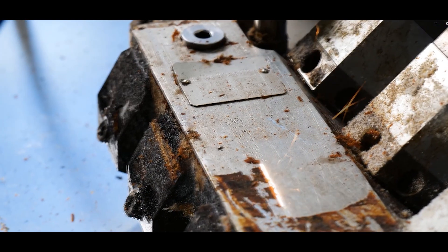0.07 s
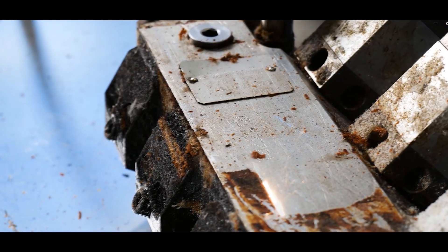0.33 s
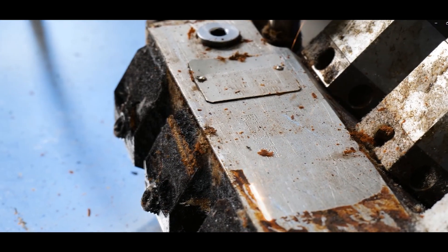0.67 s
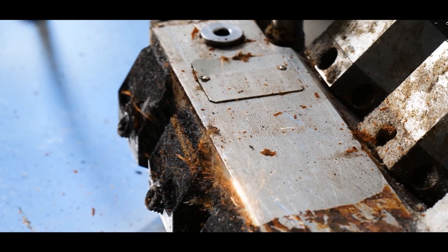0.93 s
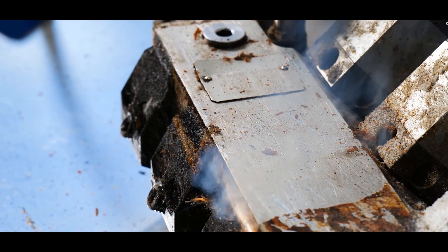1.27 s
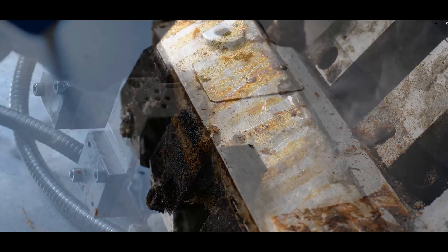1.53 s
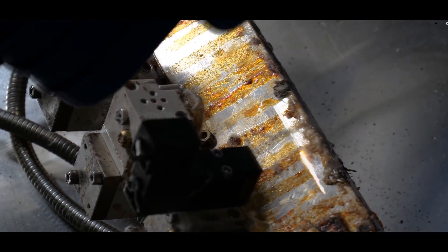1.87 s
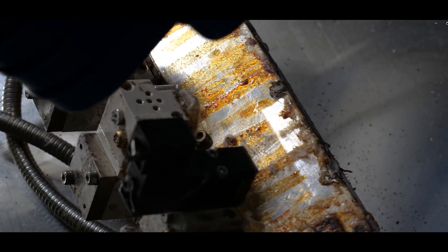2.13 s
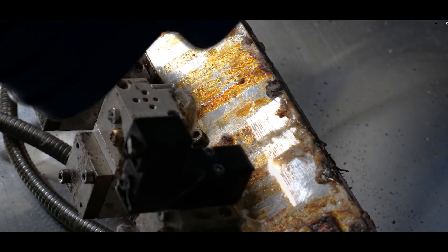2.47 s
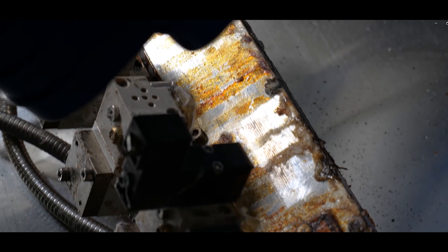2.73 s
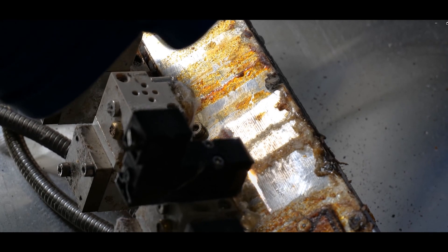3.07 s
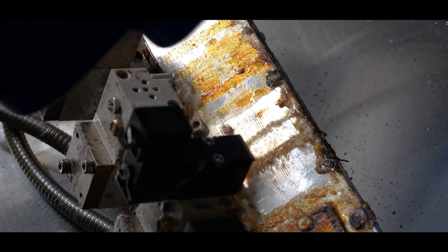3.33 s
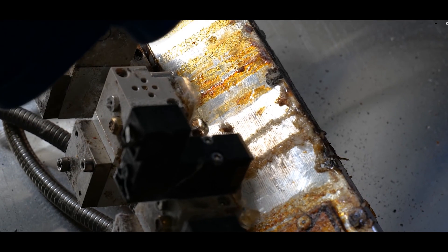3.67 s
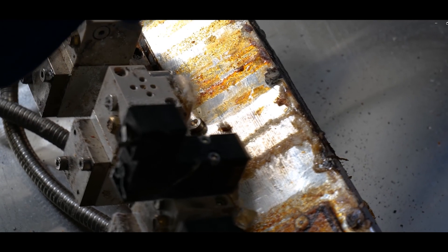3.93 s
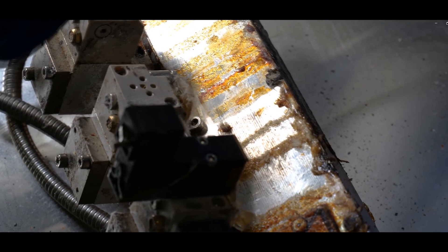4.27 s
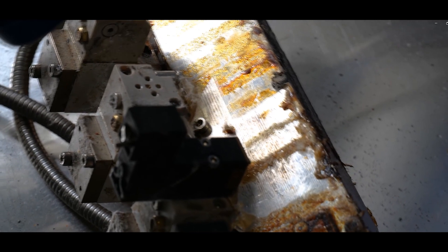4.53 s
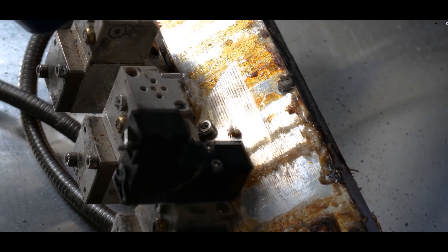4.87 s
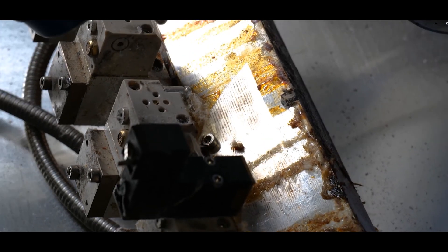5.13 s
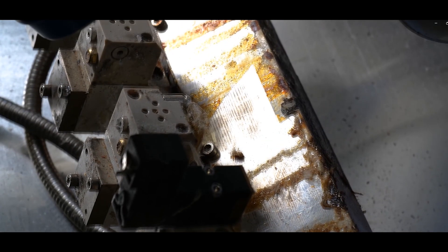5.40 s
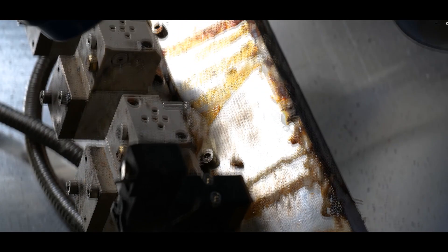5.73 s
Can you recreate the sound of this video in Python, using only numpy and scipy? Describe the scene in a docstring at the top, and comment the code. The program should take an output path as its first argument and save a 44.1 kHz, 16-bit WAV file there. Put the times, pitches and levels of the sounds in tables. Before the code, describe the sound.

A laser cleaner strips rust from steel with a piercing, fluttering whine and sizzle over a low fan hum.

```python
"""In a workshop, a hand-held pulsed laser strips rust from a steel part close to the microphone.
Each shot pops a tiny plume, and this periodic train is heard as a piercing whine with two overtones.
A mirror swings the beam to and fro, so the whine is amplitude-modulated and Doppler-shifted.
The bursting rust sizzles, thick flakes snap off, and the room adds a short reverberation.
Behind it a fan hums over the broadband noise of turbulent air."""
import sys
import numpy as np
from scipy import signal
from scipy.fft import rfft, irfft, next_fast_len
from scipy.io import wavfile
from scipy.ndimage import uniform_filter1d, map_coordinates

SR = 44100
rng = np.random.default_rng(int(sys.argv[2]) if len(sys.argv) > 2 else 0)


def to_wav(s):
    """Save 16-bit WAV."""
    ch = np.atleast_2d(s).T  # columns
    pcm = np.round(np.clip(ch, -1, 1) * 32767)  # PCM
    wavfile.write(sys.argv[1], SR, pcm.astype(np.int16))


N = 263718
TIME = np.arange(N) / SR
OPPOSED = np.array([[1], [-1]])  # opposite signs for left and right


def undb(db):
    """Amplitude ratio of a level in decibels."""
    return 10 ** (np.asarray(db) / 20)


def unit(x):
    """Normalisation to rms 1."""
    return x / np.sqrt(np.mean(x ** 2))


def curves(table):
    """Linear interpolation of each column over time."""
    times, *columns = np.transpose(table)
    return [np.interp(TIME, times, column) for column in columns]


def walk(rate_hz):
    """Low-pass random modulation: held values, smoothed twice, with a spread near 1."""
    hold = max(int(SR / rate_hz), 1)
    steps = np.repeat(rng.standard_normal(N // hold + 1), hold)
    return 1.361 * uniform_filter1d(uniform_filter1d(steps, hold), hold)[:N]


def noise(colour, side_db):
    """Spectrally shaped mid-side noise of rms 1; side_db, a value or a spectrum, sets its width."""
    size = next_fast_len(N)
    log_hz = np.log(np.fft.rfftfreq(size, 1 / SR) + 1)

    def gain(spectrum):
        hz, db = np.transpose(spectrum)
        return undb(np.interp(log_hz, np.log(hz), db))

    mid, side = rfft(rng.standard_normal((2, size))) * gain(colour)
    width = gain(side_db) if np.ndim(side_db) else undb(side_db)
    return unit(irfft(mid + width * side * OPPOSED, size)[:, :N])


def wavering(hz, spread_hz):
    """Random frequency modulation of a tone of rms 1."""
    return np.sqrt(2) * np.sin(2 * np.pi * np.cumsum(hz + spread_hz * walk(25)) / SR)


def turbulence(rumble_db, rush_db):
    """Turbulent flow radiates broadband noise: a low rumble and a rush of air."""
    # spectra of the fan's noise: (frequency [Hz], relative level [dB])
    rumble_colour = [(25, -31), (50, -27.5), (90, -22.5), (115, -12.5), (140, -1.5), (165, -4.5),
                     (200, 1.5), (270, 1.5), (350, -1.5), (450, -14), (700, -32.5)]
    rush_colour = [(60, -16), (250, -10), (480, 1.5), (850, 3.5), (1100, -0.5), (1500, 1), (2000, -3.5),
                   (2700, -11.5), (4000, -14), (9000, -40)]
    # stereo width: (frequency [Hz], side minus mid [dB])
    width = [(30, -18), (65, -9), (130, -25), (250, -24.5), (500, -14.5), (1000, -7), (2000, -8.5),
             (4000, -11)]
    rumble = noise(rumble_colour, width) * undb(rumble_db - 1.3)
    rush = noise(rush_colour, width) * undb(rush_db - .42 - .7 * OPPOSED)
    return rumble + rush


def blade_hum():
    """The periodic passage of the blades gives a tone, which swells and sinks."""
    # envelope: (time [s], relative level [dB])
    envelope = [(0.0, -45.5), (0.53, -46), (0.61, -36.5), (0.68, -47), (1.5, -42), (1.56, -52),
                (1.7, -34.5), (2.06, -47), (2.2, -31.5), (2.43, -46.5), (3.08, -40.5), (3.3, -57),
                (3.35, -40.5), (3.61, -48), (4.18, -39), (4.23, -50), (4.43, -41), (4.46, -54),
                (5.51, -36.5), (5.56, -49), (5.73, -38.5), (5.98, -56)]
    return wavering(hz=192.7, spread_hz=3.3) * undb(curves(envelope)[0] - 1 + 1.8 * walk(14))


def motor_whistle(hz=1922):
    """A thin motor tone comes and goes, randomly modulated in amplitude and phase."""
    # envelope: (time [s], level [dB])
    envelope = [(0, -66), (1.1, -64), (1.4, -56.5), (2.2, -52.5), (2.7, -61.5), (4, -61.5), (5.98, -73)]
    gain = undb(curves(envelope)[0] + 2.1 * walk(10.2))
    return gain * np.sqrt(2) * np.sin(2 * np.pi * hz * TIME + .5 * walk(24.95))


def fan():
    """Superposition of flow noise and machine tones; the higher tones swell with the rumble."""
    # loudness of the background rumble and rush, swelling and sinking:
    # (time [s], relative rumble level [dB], relative rush level [dB])
    loudness = [(0.0, -40.5, -46.5), (0.27, -39, -44), (0.45, -42, -45.5), (0.59, -36.5, -42.5),
                (0.8, -41, -47), (0.96, -37.5, -43.0), (1.09, -40.5, -44), (1.6, -38, -45),
                (1.73, -31.5, -42.5), (1.98, -40.0, -47), (2.18, -32.5, -45), (2.63, -43.0, -48.5),
                (2.78, -38, -46), (3.07, -38, -46), (3.19, -40.5, -49.0), (3.83, -40, -47.5),
                (4.03, -34, -44), (4.88, -42.5, -48.5), (5.42, -34.5, -45), (5.62, -34.5, -44),
                (5.75, -32.5, -42), (5.97, -43.5, -51)]
    # higher tones of fan and motor: (frequency [Hz], relative level [dB])
    lines = [(351, -51.5), (570.6, -59), (629.8, -62.5), (705.2, -58), (802.1, -58.5), (866.7, -58.5),
             (1443, -60.5)]
    rumble_db, rush_db = curves(loudness)
    air = turbulence(rumble_db, rush_db)
    hum = blade_hum()
    tones = sum(wavering(hz, spread_hz=3.59) * undb(db - 3 + 3 * walk(12)) for hz, db in lines)
    swell = undb(1.14 * (rumble_db - np.mean(rumble_db)))
    return air + hum + tones * swell + motor_whistle()


def workshop(x, t60_s, wet_db):
    """Diffuse reverberation: dense reflections decay exponentially, different at each ear."""
    t = TIME[:SR // 2]
    tail = rng.standard_normal((2, len(t))) * np.exp(-np.log(1000) * t / t60_s) * (t > .002)
    tail /= np.sqrt(np.sum(tail ** 2, axis=1, keepdims=True))
    return x + undb(wet_db) * signal.fftconvolve(x, tail, axes=1)[:, :N]


def mirror(fast_hz=35.3, slow_hz=26.81, slower_flutter_from_s=1.632, stroke_m=.032):
    """Triangular scan: swings made, place on the line (0 near, 1 far) and extra sound path [m]."""
    # the fast flutter gives way to a slower one
    flutter_hz = np.where(TIME > slower_flutter_from_s, slow_hz, fast_hz)
    swings = np.cumsum(flutter_hz) / SR - .23
    place = 1 - np.abs(1 - 2 * (swings % 1))
    path_m = stroke_m * uniform_filter1d(place, size=260)  # inertia rounds the turning points
    return swings, place, path_m


def rust(place, count, renew_hz):
    """Quasi-periodic modulation: each stroke meets the same grain, renewed as the hand moves on."""
    surface = rng.standard_normal((256, count + 1))
    return unit(map_coordinates(surface, [TIME * renew_hz, place * count], order=1, mode="mirror"))


def per_swing(gain):
    """Normalisation to a running rms near 1, averaged over a slow and a fast flutter period."""
    power = uniform_filter1d(uniform_filter1d(gain ** 2, size=1645), size=1249)
    return gain / np.sqrt(power)


def flutter(swings, swells):
    """Amplitude modulation: a Gaussian swell where the beam crosses rust, going out and coming back."""
    out_place, out_width, out_db, back_place, back_width, back_db = curves(swells)
    crossings = (out_place / 2, out_width, out_db), (1 - back_place / 2, back_width, back_db)
    gain = 1
    for centre, width, db in crossings:
        distance = 2 * ((swings - centre + .5) % 1 - .5)
        gain = gain + undb(db) * np.exp(-(distance / np.maximum(width, .03)) ** 2)
    return per_swing(gain)


def interference(place, fringes_per_line=2.13):
    """Sound reflected by the steel cancels and reinforces the direct sound in turn along the line."""
    # strength of the fringes: (time [s], depth [0-1])
    depth = [(0, 0.17), (.9, .15), (2.0, 0.28), (3.0, 0.17), (3.6, 0.25), (4.3, 0), (4.75, 0.23),
             (4.93, 0.6), (5.1, 0.6), (5.35, .35), (5.97, 0.2)]
    return 1 + curves(depth)[0] * np.cos(2 * np.pi * fringes_per_line * place)


def frying(swell, pulsing=.35):
    """Thin rust gives fine band-limited noise just above the fundamental, weakly sharing its flutter."""
    # envelope: (time [s], level [dB])
    envelope = [(0, -51), (1.9, -54), (2.8, -51), (3.3, -57), (4.06, -56), (4.4, -51), (4.85, -47),
                (5.05, -45.5), (5.75, -45), (5.87, -44)]
    # spectrum: (frequency [Hz], relative level [dB])
    colour = [(4200, -30), (4850, -4), (5250, 2.5), (5600, -1.5), (6200, -15.5), (7500, -30)]
    hiss = noise(colour, side_db=-9) * undb(curves(envelope)[0] + 1.5 * walk(1500))
    return hiss * per_swing(swell ** pulsing)


def sizzle(swell, level_db, pulsing=.68):
    """Rust comes off in fits: noise modulated by the scan and by random bursts."""
    # spectrum: (frequency [Hz], relative level [dB])
    colour = [(2000, -28.5), (3900, -3), (4650, 3), (5300, 3.5), (6500, -0.5), (7600, -0.5), (9300, 7),
              (10500, 7.5), (12300, 1.5), (13600, 0), (14600, 5.5), (15200, -4), (15800, -20)]
    fits = unit(undb(1.8 * walk(500) + walk(45) + 2.6 * walk(2500)))
    bursts = per_swing(swell ** pulsing) * fits
    return noise(colour, side_db=-22.5) * undb(level_db) * bursts


def flakes(partials, rise_s=.00048):
    """Damped transients: a thick flake snaps off with a blip of each partial and a dry crack."""
    # snaps: (time [s], levels of partials 1, 2, 3 [dB], crack level [dB], decay time [s])
    snaps = [(0.0126, -40, -24, -36, -36, .001), (.0635, -38, -20, -37, -36, .001),
             (0.0916, -31, -21, -34, -31, .001), (0.1202, -26, -17, -29, -27, 0.0011),
             (1.0862, -35, -33, -34, -35, .0006), (1.157, -32, -34, -28, -35, .0006),
             (1.8154, -31, -20.5, -38, -33, 0.0028), (3.2127, -42, -21.5, -30, -35, 0.0014),
             (3.325, -44, -27, -36, -36, .0016), (3.921, -32, -26, -31, -33, 0.0012),
             (3.9595, -35, -30, -34, -34, 0.0013), (4.097, -42, -33, -28, -27, .0018),
             (4.134, -32, -27, -41, -27, .0016), (4.1718, -35, -27, -29, -32, .0014),
             (4.2085, -31, -29, -37, -34, .0016), (4.2458, -31, -31, -39, -32, .0016),
             (4.283, -32, -32, -40, -30, .0016), (4.3165, -34, -30, -44, -28, .0016),
             (4.4317, -27, -39, -38, -37, 0.0013), (4.469, -27, -34, -35, -33, 0.0012),
             (5.8399, -25, -19, -25, -28, .0013), (5.863, -26, -18.5, -21.5, -24, 0.0011),
             (5.8768, -25.5, -22, -25, -26, 0.0011), (5.9003, -28, -22, -22, -23, 0.00098),
             (5.9139, -28, -19, -23.5, -29, 0.0011), (5.9376, -29, -21, -22, -31, .0012),
             (5.9512, -30, -23, -23.5, -28, .0016), (5.975, -26, -19.5, -20.5, -29, .0013)]
    # spectrum of the crack: (frequency [Hz], relative level [dB])
    crack_colour = [(2000, -30), (3800, -17), (4600, 6), (5400, 7), (6300, -1), (7800, -11), (9400, 6),
                    (10700, 11), (12400, -6), (14500, 2), (16000, -5)]
    sounds = [*partials, noise(crack_colour, side_db=-9)]
    out = np.zeros((2, N))
    for peak_s, *levels_db, decay_s in snaps:
        near = np.abs(TIME - peak_s) < .015
        age = TIME[near] - peak_s
        flare = np.exp(-(np.minimum(age, 0) / rise_s) ** 2 - np.maximum(age, 0) / decay_s)
        out[:, near] += flare * sum(undb(db) * sound[:, near] for db, sound in zip(levels_db, sounds))
    return out


def rasp(harmonic, shots, place, spread_hz, chance):
    """Uneven shots spread a partial into noise sidebands, partly by the rust's grain, partly by chance."""
    lowpass = signal.butter(1, spread_hz, fs=SR)
    sidebands = 0
    for wave in (np.sin, np.cos):
        scatter = rust(place, count=36, renew_hz=2.49) + chance * walk(2600)
        sidebands = sidebands + signal.lfilter(*lowpass, scatter) * wave(2 * np.pi * harmonic * shots)
    return unit(sidebands)


def partial(harmonic, shots, place):
    """A harmonic of the shot rate, phase-modulated by the surface, a little differently at each ear."""
    common_rad = .15 * rust(place, count=6, renew_hz=2.23)
    apart_rad = .035 * rust(place, count=3, renew_hz=1.62)
    return np.sqrt(2) * np.sin(2 * np.pi * harmonic * shots + common_rad + OPPOSED * apart_rad)


def whine(partials, flutters, levels_db, sizzle_db, shots, place):
    """Directivity: each fluttering partial, with its rasp, beams its own way as the hand moves."""
    # balance: (time [s], left minus right for partials 1, 2, 3 [dB])
    beaming = [(0.0, -2, 1, -2.5), (0.25, 1, -1, -4.0), (0.68, 4, -2.5, 5), (0.8, 4, -0.5, 6.5),
               (1.41, -3, 1, -2), (1.61, 0, 0.5, -2.0), (1.9, -2.0, -0.5, 4), (2.53, -2.5, 0.0, -1.0),
               (3.0, -1.5, -0.5, -0.5), (3.26, -2.5, -1.0, 5), (3.88, -3.0, 0.5, 0), (4.26, -2.0, 0, 6),
               (4.5, -1.5, -0.5, -2.0), (4.65, -1.0, 1, 4.0), (5.09, -2.5, -1.0, -4.0),
               (5.75, -4.5, -1.0, 3), (5.88, 0.5, -0.5, 3.5), (5.98, -0.5, -1.0, 3.0)]
    # one row a partial: (trim [dB], patchiness along the line [dB], flutter exponent [-])
    voicing = [(0.8, 1.44, 1), (0.62, 1.5, 0.98), (0, 2.5, 0.94)]
    # rasp at average sizzle: (levels round partials 1, 2, 3 [dB])
    rasp_db = [-50.5, -37.5, -45]
    rustiness_db = .6 * (sizzle_db - np.mean(sizzle_db))  # the rasp grows with the sizzle
    out = 0
    for k, ((trim_db, patchy_db, depth), pan_db) in enumerate(zip(voicing, curves(beaming))):
        patches = undb(patchy_db * rust(place, count=11, renew_hz=3.01) + walk(40))
        tone = partials[k] * per_swing(flutters[k] ** depth * patches)
        tone *= undb(levels_db[k] + trim_db + .6 * walk(12))
        grit = rasp(k + 1, shots, place, spread_hz=140, chance=.6)
        grit *= per_swing(flutters[k] ** .72) * undb(rasp_db[k] + rustiness_db)
        out = out + (tone + grit) * undb(OPPOSED * pan_db / 2)
    return out


def laser(shot_hz=5000, sound_m_per_s=343):
    """A pulse train radiates harmonics of its rate; the moving spot adds Doppler shift and flutter."""
    # loudness as the hand moves: (time [s], relative levels of partials 1, 2, 3 [dB], sizzle level [dB])
    work = [(0.0, -34.5, -30, -35.5, -44), (0.85, -41.5, -29, -30, -42.5), (0.94, -48, -35, -40.0, -49),
            (1.06, -40.5, -29, -30, -40.5), (1.43, -39, -30.5, -38, -42.5), (1.56, -36, -29, -36, -42),
            (1.69, -38, -35.5, -40, -48), (1.76, -47, -33.5, -39, -42.5), (1.92, -35.5, -30, -33.5, -41),
            (2.81, -30.0, -32.5, -36, -39), (3.1, -32, -28.5, -35, -39.5), (3.37, -41.5, -29, -36, -42),
            (3.59, -39.5, -26.5, -35, -42), (3.97, -38, -36, -40, -43), (4.06, -44.5, -47, -50, -57),
            (4.18, -40, -38.5, -40, -50), (4.3, -38.5, -38, -45, -44.5), (4.37, -39, -37.5, -43, -41.5),
            (4.45, -35, -30.5, -38, -44.5), (4.86, -38, -28, -35.5, -43.5), (5.1, -38, -31, -34, -43),
            (5.37, -40, -34.5, -35, -41.5), (5.53, -40, -41, -37, -45.5), (5.81, -37, -33.5, -35, -40.5),
            (5.87, -42, -36, -38, -47), (5.97, -40, -34, -40, -42)]
    # where each partial swells: (time [s], then for the outward and the return stroke:
    # place [0 near, 1 far], width [share of the line], level re the steady part [dB])
    swells_first = [(0.0, 0.5, 0.35, 0, 0.66, 0.36, 3.5), (0.6, 0.42, 0.3, 6, 0.64, 0.43, 10.5),
                    (1.0, 0.17, 0.48, 8, 0.86, 0.17, 16.0), (1.5, 0.0, 0.55, 12.5, 0.88, 0.1, 3.0),
                    (1.8, 0.71, 0.33, -0.5, 0.5, 0.3, -3), (2.3, 0.61, 0.49, 1.5, 0.51, 0.25, 3.5),
                    (2.7, 0.65, 0.34, 7.5, 0.47, 0.23, 4.5), (3.15, 0.72, 0.35, 10.5, 0.47, 0.26, 6),
                    (3.4, 0.52, 0.39, 4, 0.57, 0.18, 0), (3.9, 1.0, 0.049, 3, 0.22, 0.33, 14),
                    (4.15, 0.92, 0.11, 17.5, 0.17, 0.44, 11), (4.45, 0.82, 0.15, 5, 0.4, 0.33, -2),
                    (4.8, 0.84, 0.28, 13.5, 0.52, 0.19, 7.0), (5.05, 0.96, 0.12, -9.0, 0.37, 0.15, 11),
                    (5.45, 0.97, 0.21, 16.5, 0.15, 0.5, 10), (5.8, 0.93, 0.21, 11, 0.18, 0.24, 4),
                    (5.97, 0.84, 0.42, -0.0, 0.27, 0.18, 4.0)]
    swells_second = [(0, .49, 0.2, 17, 0.32, .47, 18), (.5, .54, 0.16, 10, 0.16, 0.55, 15),
                     (.85, 0.54, .16, 1, 0.22, .4, 4), (1.15, 0.44, .2, -3, 0.21, .45, 0),
                     (1.5, .2, .4, 0, .3, .6, 7), (1.65, .4, .3, -1, .45, .3, 2),
                     (1.9, 0.53, .37, 8, .64, .38, 2), (2.4, 0.54, 0.39, -1.5, 0.32, 0.25, 9),
                     (2.9, .54, 0.25, 3, 0.34, .19, 12.5), (3.3, 0.44, 0.28, 3, 0.38, .21, 5.5),
                     (3.7, 0.63, 0.48, 9, 0.38, 0.2, 16.5), (4.0, .41, .54, -1, 0.33, .09, 8),
                     (4.2, 1, .16, -5, 0.24, .12, 12), (4.5, 0.96, .15, 14, .4, .13, -4),
                     (4.8, 0.82, 0.26, 21, .56, .1, 2), (4.95, 0.78, 0.34, 19, 0.48, .14, 13),
                     (5.1, .73, 0.54, 9, 0.41, 0.15, 9), (5.5, 0.96, .58, 6, .45, .15, 9),
                     (5.8, .89, .4, 15, 0.44, .23, 12), (5.97, .8, .63, 1, .32, .16, 6)]
    swells_third = [(0.0, 0.35, 0.39, 18.0, 0.51, 0.19, 22.0), (0.6, 0.37, 0.21, 9.0, 0.42, 0.31, 14),
                    (1.1, 0.47, 0.21, 13, 0.64, 0.34, 19.0), (1.5, 0.37, 0.43, 7, 0.69, 0.32, 11.0),
                    (1.9, 0.52, 0.26, 8, 0.52, 0.45, 8.0), (2.5, 0.37, 0.14, 3.0, 0.65, 0.18, -3.0),
                    (3.0, 0.33, 0.13, 7.0, 0.41, 0.25, 1.0), (3.5, 0.53, 0.28, 12.0, 0.61, 0.31, 7.0),
                    (3.9, 0.27, 0.16, 16, 0.18, 0.14, 9.0), (4.2, 0.14, 0.2, -10.0, 0.31, 0.09, 18.0),
                    (4.5, 0.74, 0.21, 24, 0.0, 0.33, -4), (4.8, 0.89, 0.33, 21, 0.38, 0.16, 13.0),
                    (5.1, 0.71, 0.36, 17, 0.23, 0.14, 15), (5.5, 0.66, 0.23, 17.0, 0.56, 0.29, 12.0),
                    (5.8, 0.77, 0.24, 8.0, 0.45, 0.23, 10), (5.97, 0.46, 0.22, 11.0, 0.46, 0.23, 11.0)]
    swings, place, path_m = mirror()
    shots = shot_hz * (TIME - path_m / sound_m_per_s)  # shots heard so far, delayed by the extra path
    *levels_db, sizzle_db = curves(work)
    partials = [partial(harmonic, shots, place) for harmonic in (1, 2, 3)]
    flutters = [flutter(swings, swells) for swells in (swells_first, swells_second, swells_third)]
    flutters[1] = per_swing(flutters[1] * interference(place))
    tones = whine(partials, flutters, levels_db, sizzle_db, shots, place)
    return tones + sizzle(sum(flutters), sizzle_db) + frying(flutters[0]) + flakes(partials)


def scene():
    """Superposition of the laser, its reverberation and the fan."""
    return workshop(laser(), t60_s=.11, wet_db=-10.5) + fan()


def record(dry):
    """Band limiting: a steep low-pass removes the treble above 15.6 kHz."""
    return signal.sosfilt(signal.ellip(8, .1, 80, 15600, fs=SR, output="sos"), dry)


dry = scene()
out = record(dry)
to_wav(out)
```